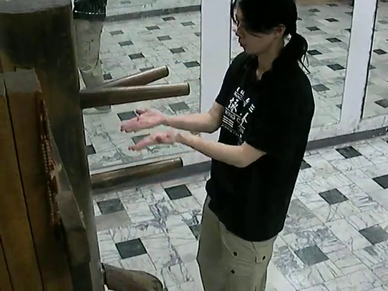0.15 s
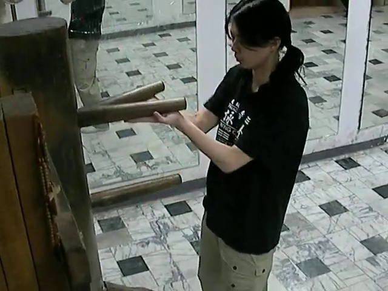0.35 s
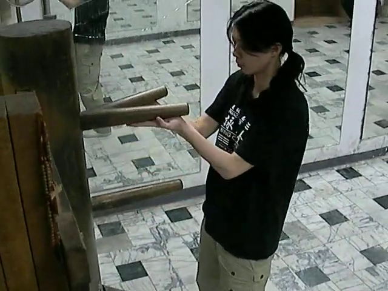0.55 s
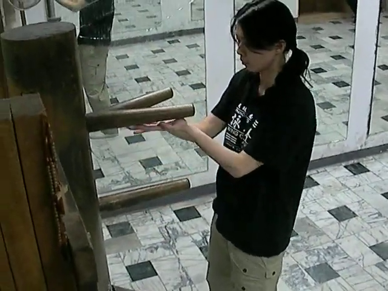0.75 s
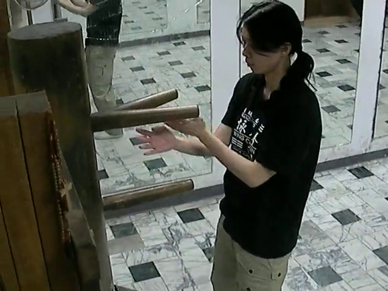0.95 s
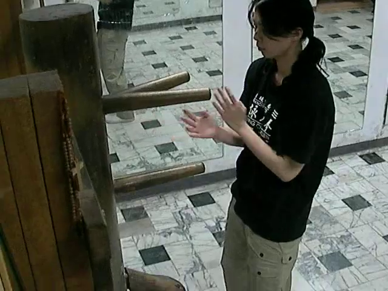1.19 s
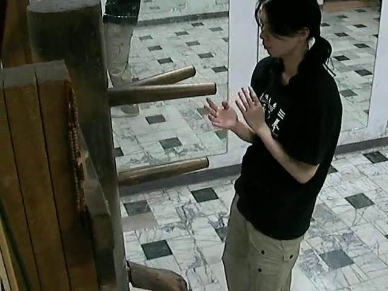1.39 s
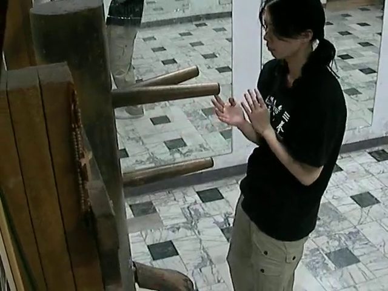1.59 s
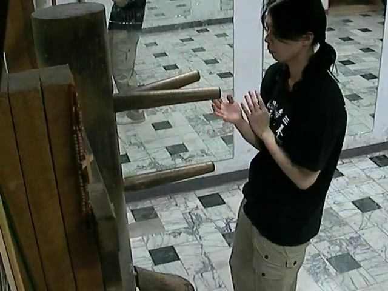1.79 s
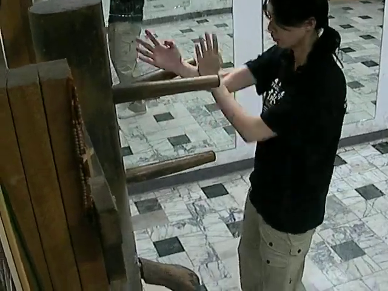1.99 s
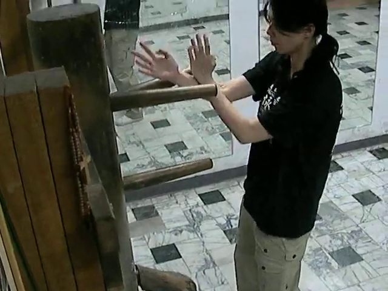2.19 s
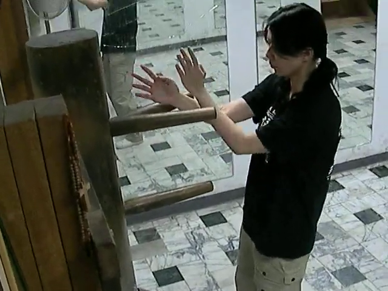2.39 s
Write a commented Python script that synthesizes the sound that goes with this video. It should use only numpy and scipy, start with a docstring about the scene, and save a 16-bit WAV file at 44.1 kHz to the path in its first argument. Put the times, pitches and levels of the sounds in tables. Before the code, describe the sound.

Forearms strike a wooden training dummy twice, about two seconds apart. Each blow is a skin slap, a deep thud and loose wooden arms knocking, ringing briefly in a tiled room over a low hum and faint hiss.

```python
"""Wooden dummy in a tiled room

Forearms strike a wooden training dummy twice. In each blow skin slaps the wooden arms, the trunk
booms and the loose arms knock in their sockets; a hand then slides on the wood. The hard room
rings on over a low, rumbling hum and a faint hiss."""
import sys
import numpy as np
from scipy import signal
from scipy.fft import rfft, irfft
from scipy.io import wavfile

SR = 44100
rng = np.random.default_rng(int(sys.argv[2]) if len(sys.argv) > 2 else 0)


def store_wav(level_fs):
    """Save 16-bit WAV to argv[1]."""
    pcm = np.round(np.clip(np.atleast_2d(level_fs), -1, 1) * 32767)
    wavfile.write(sys.argv[1], SR, pcm.T.astype(np.int16))


N = 108045
T = np.arange(N) / SR
FREQS = np.maximum(np.arange(N + 1) * SR / (2 * N), 1)


def undb(db):
    """Decibels to gain."""
    return 10 ** (np.asarray(db) / 20)


def curve(points):
    """(Hz, value) points joined on a log-frequency axis."""
    hz, value = np.array(points, float).T
    return np.interp(np.log(FREQS), np.log(hz), value)


def shape(x, gain):
    """Filter by a gain at every frequency."""
    return irfft(rfft(x, 2 * N) * gain)[..., :N]


def colour(x, points):
    """Causal filter of unit power with the given spectrum."""
    gain = undb(curve(points))
    cepstrum = irfft(np.log(gain / np.sqrt(np.mean(gain ** 2))))
    causal = np.r_[cepstrum[0], 2 * cepstrum[1:N]]
    return shape(x, np.exp(rfft(causal, 2 * N)))


def pan(db):
    """Left and right gains for a level difference."""
    return undb(np.array([db, -db]).reshape(2, -1) / 2)


def contact(start, rise_s, decay_s):
    """Power over time of one contact; its energy is 1."""
    age = np.maximum(T - start, 0)
    power = ((1 - np.exp(-age / rise_s)) * np.exp(-age / decay_s)) ** 2
    return power / power.sum()


def ring(start, modes, rise_s):
    """Decaying modes (Hz, t60 s, dB) that swell from the moment of a blow."""
    age = T[T >= start] - start
    tone = sum(undb(db - 60 * age / t60) * np.sin(2 * np.pi * hz * age) for hz, t60, db in modes)
    return np.r_[np.zeros(N - len(age)), tone * (1 - np.exp(-age / rise_s))]


def burst(power):
    """Noise that follows a power curve."""
    return np.sqrt(power) * rng.standard_normal(N)


def narrow_noise(hz, width_hz):
    """Noise of rms 1 around one frequency."""
    x = shape(rng.standard_normal(N), 1 / (1 + (2 * (FREQS - hz) / width_hz) ** 4))
    return x / x.std()


# Stereo width of the room. Each row: frequency in Hz, side against mid in dB.
ROOM_WIDTH = [(50, -15), (250, -15.5), (700, -6.5), (1400, -6), (2800, -1.5), (5500, 0.5), (12000, 2)]

def wide_noise():
    """Noise at both microphones: alike in the bass, different in the treble."""
    mid, side = rng.standard_normal((2, N))
    side_gain = undb(curve(ROOM_WIDTH))
    side = shape(side, side_gain)
    return shape(np.array([mid + side, mid - side]), 1 / np.sqrt(1 + side_gain ** 2))


# Tone of the hum and of the hiss. Each row: frequency in Hz, level in dB.
HUM_EQ = [(25, -77), (42, -35), (60, -20.5), (110, -7.5), (150, -8), (185, -0.5), (238, -6.5), (315, -8.5),
          (375, -24.5), (600, -39), (2000, -101.5)]
HISS_EQ = [(100, -3), (500, 3), (800, 0), (1500, 0), (3000, -2.5), (4200, -7.5), (6500, -13.5), (9000, -25),
           (11000, -15), (13500, -41)]
# The drone's swells and dips. Each row: time in seconds, level in dB.
DRONE_FADER = [(0, -37), (.72, -36), (.95, -46), (1.1, -54), (1.22, -34), (1.52, -48), (1.64, -33.5),
               (1.76, -43.5), (2.45, -36.5)]

def room_tone():
    """A wavering low hum, likely ventilation, with one stronger drone and an even hiss."""
    waver_db = narrow_noise(0, width_hz=44)
    hum = undb(-37.5 - waver_db) * colour(wide_noise(), HUM_EQ)
    drone_db = np.interp(T, *np.array(DRONE_FADER).T)
    drone = undb(drone_db) * narrow_noise(hz=240.1, width_hz=13.7)
    hiss = undb(-50) * colour(wide_noise(), HISS_EQ)
    return hum + drone + hiss


# The tail of the tiled room. Each row: frequency in Hz, t60 in seconds.
REVERB_TIMES = [(100, 0.56), (250, 0.99), (600, 0.5), (1500, 0.76), (3500, 0.65), (7000, 0.61),
                (13000, 0.42)]

def reverb(power):
    """Diffuse sound that a source builds up in the room; each octave dies at its own rate."""
    noise, t60 = rfft(wide_noise()), curve(REVERB_TIMES)
    octave = np.clip(np.log2(FREQS / 110), 0, 7)
    tail = 0
    for k in range(8):
        band = np.maximum(1 - abs(octave - k), 0)
        decay_s = np.average(t60, weights=band) / np.log(1000)
        response = contact(start=0.0012, rise_s=0.01, decay_s=decay_s)
        envelope = np.sqrt(abs(signal.fftconvolve(power, response)[:N]))
        tail += irfft(noise * band[::2], N) * envelope
    return tail


# Skin landing on the wooden arms. Each row: start in seconds, smack level in dB, snap level in dB,
# rise and decay in seconds, left over right in dB.
SLAP_HITS = [(0.2448, 0.5, -1, 0.00017, 0.0007, -4), (0.2472, -6.5, 5.5, 0.000039, 0.001, 10),
             (0.253, -4.5, -20, .0005, .005, 2), (0.3013, 0.5, 0.5, .0003, 0.0044, 3),
             (0.3057, -6, 5.5, .0002, 0.0024, 7), (0.31, -3.5, 0.5, .0004, .004, -1),
             (1.963, -10, 0, 0.0012, 0.014, 12.5), (1.9835, -3, -19, 0.0012, 0.01, -4),
             (2.022, -5, -13, 0.00065, 0.0054, -2), (2.026, -6.5, -10, .0005, 0.0042, 8)]
# Tone of the smack and of the snap. Each row: frequency in Hz, level in dB.
SMACK_EQ = [(150, -13), (700, -9.5), (1600, -0.5), (2800, 3), (4200, 0.5), (6000, -2.5), (7500, -17.5),
            (10500, -6), (13500, -32)]
SNAP_EQ = [(2000, -29), (3200, -3), (4000, 5), (5200, -3), (7000, -3), (9500, -0.5), (13000, 5)]
# The high mode of a slapped arm. Each row: frequency in Hz, t60 in seconds, level in dB.
CLACK_MODE = [(4024, 0.051, -23)]
# Bounces off floor and mirror. Each row: delay in seconds, level in dB.
BOUNCES = [(.0068, -11), (.0098, -6)]

def slaps():
    """Skin on wood: a broad smack, and where the contact is hard a bright snap and a hollow clack."""
    _, smack_db, snap_db, *_ = np.array(SLAP_HITS).T
    skin = 0
    for levels_db, eq in (smack_db + 4.5, SMACK_EQ), (snap_db - 3.5, SNAP_EQ):
        direct, total_power = 0, 0
        for db, (start, _, _, rise, decay, pan_db) in zip(levels_db, SLAP_HITS):
            power = undb(db) ** 2 * contact(start, rise, decay)
            direct += burst(power) * pan(pan_db)
            total_power += power
        early_power = sum(undb(db) ** 2 * np.interp(T - delay, T, total_power) for delay, db in BOUNCES)
        skin += colour(direct + burst(abs(early_power)) + undb(3.5) * reverb(total_power), eq)
    clack = sum(undb(db) * ring(start, CLACK_MODE, rise) for start, _, db, rise, _, _ in SLAP_HITS)
    return skin + clack


# Shoves on the trunk. Each row: start in seconds, boom level in dB, jolt level in dB,
# direction (0 upward, 1 forward).
SHOVES = [(.256, -27, -10.5, 0), (.2758, -1.3, -4.5, 0), (.2911, 5, -4, 0), (0.3752, 2.1, -10.5, 0),
          (1.9741, -1.5, -7.5, 1), (2.007, -2.6, -7, 1), (2.0954, -10, -21, 1), (2.1631, -10, -19, 1)]
# The body of trunk and frame. Each row: frequency in Hz, t60 in seconds, level in dB when struck
# upward, level in dB when struck forward.
TRUNK_MODES = [(142, 0.45, -15.5, -7), (196.7, 0.65, -3, -23.9), (203, 0.63, -13.5, 0),
               (214.8, 0.087, 16.9, 15), (237.7, 0.72, -4, -10.5), (284.2, 0.82, -10.5, -5.5),
               (292.8, .25, 17.5, -3), (317.5, 0.72, -5, -8), (422.6, 0.48, -16, -27)]
# Tone of the jolt. Each row: frequency in Hz, level in dB.
JOLT_EQ = [(25, -22), (55, -21.5), (110, -8), (190, 4.5), (310, 0.5), (390, -20), (900, -52), (4000, -60)]

def trunk_thuds():
    """The heavy trunk jolts on its frame and booms; the direction of the shove weights the modes."""
    boom, power = 0, 0
    for start, boom_db, jolt_db, direction in SHOVES:
        way = round(direction)
        modes = [(hz, t60, levels[way]) for hz, t60, *levels in TRUNK_MODES]
        boom += undb(boom_db - 13.5) * ring(start, modes, rise_s=(0.051, 0.0075)[way])
        power += undb(jolt_db + 15) ** 2 * contact(start, rise_s=0.0072, decay_s=0.0087)
    return boom + colour(burst(power) + undb(4) * reverb(power), JOLT_EQ)


# Loose arms hitting their sockets. Each row: start in seconds, crack level in dB, ring level in dB,
# crack decay in seconds, tilt of the ring in dB per octave.
SOCKET_HITS = [(.27552, -4, -1.5, 0.0025, 2.5), (.28689, -2.5, 1, 0.0021, -2.5),
               (.32718, -2.5, 5.5, 0.025, -8), (.39218, -7, -4.5, 0.012, -5), (.733, -34, -36.5, 0.0083, 6),
               (1.957, -12, -15.5, 0.017, 1), (1.96877, -15, -4.5, .007, -1), (1.986, -6, -17, 0.0043, 5),
               (2.05926, -17, -3.5, 0.016, -10.5)]
# The ring of the arms. Each row: frequency in Hz, t60 in seconds, level in dB.
ARM_MODES = [(469.4, 0.89, -11.5), (507.4, 0.25, 0.5), (533, 0.2, -3), (629.3, 0.28, -6), (735.9, 0.59, -8),
             (805, 0.059, 2.5), (957, 0.52, -9), (1009.5, 0.5, -6.5), (1204.5, .15, -1.5),
             (1334.8, 0.51, -10), (1443, 0.5, -8), (1533, 0.48, -3)]
# Tone of the crack. Each row: frequency in Hz, level in dB.
CRACK_EQ = [(60, -20), (170, 2), (410, 3), (510, 3.5), (700, 4.5), (880, -3.5), (1500, 0.5), (2500, -15.5),
            (5000, -29), (13000, -35)]

def arm_knocks():
    """Wood hits wood: a dull crack and the ring of the arm; a soft contact favours the low modes."""
    tone, power = 0, 0
    for start, crack_db, ring_db, decay, tilt in SOCKET_HITS:
        power += undb(crack_db + 8.5) ** 2 * contact(start, rise_s=0.0011, decay_s=decay)
        modes = [(hz, t60, db + tilt * np.log2(hz / 500)) for hz, t60, db in ARM_MODES]
        tone += undb(ring_db - 25) * ring(start, modes, rise_s=0.001)
    return tone + colour(burst(power) + undb(-1) * reverb(power), CRACK_EQ)


# Hands and sleeves sliding. Each row: start in seconds, level in dB, rise and fall in seconds.
SLIDES = [(0.577, -42.5, 0.029, 0.054), (1.68, -61.5, 0.05, 0.22), (1.94, -31.5, 0.02, 0.014)]
# Tone of the friction. Each row: frequency in Hz, level in dB.
SLIDE_EQ = [(300, -13), (1500, 2.5), (3200, 5), (6500, -3.5), (9000, -5.5), (11500, 3.5), (13500, -8)]

def hand_slides():
    """Skin and cloth hiss briefly as they slide."""
    envelope = 0
    for start, db, rise, fall in SLIDES:
        fade_in = np.clip((T - start) / rise, 0, 1)
        fade_out = np.exp(-np.maximum(T - start - rise, 0) / fall)
        envelope += undb(db) * fade_in * fade_out
    power = envelope ** 2
    return colour(burst(power) + undb(-4.5) * reverb(power), SLIDE_EQ)


def scene():
    """Two blows on the dummy over the room tone."""
    return room_tone() + slaps() + trunk_thuds() + arm_knocks() + hand_slides()


# The lean of the stereo pair. Each row: frequency in Hz, left over right in dB.
MIC_LEAN = [(200, 0.2), (800, 0.5), (2800, -1.9), (5500, -0.5), (9500, 1), (13000, 0)]

def record(dry):
    """Two slightly unequal microphones, a narrow dip in the treble and a steep top cut."""
    dip_hz, dip_width_hz, top_hz = 8000, 290, 13450
    dip = undb(-23 * np.exp(-((FREQS - dip_hz) / dip_width_hz) ** 2))
    heard = shape(dry, dip * pan(curve(MIC_LEAN)))
    return signal.sosfilt(signal.ellip(10, .2, 80, top_hz, fs=SR, output="sos"), heard)


dry = scene()
out = record(dry)
store_wav(out)
```